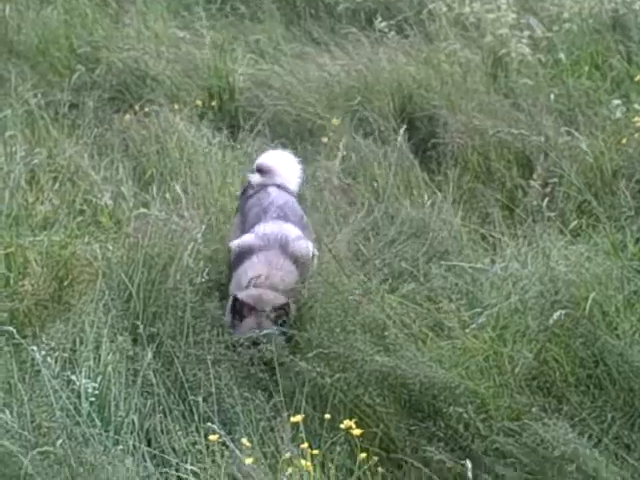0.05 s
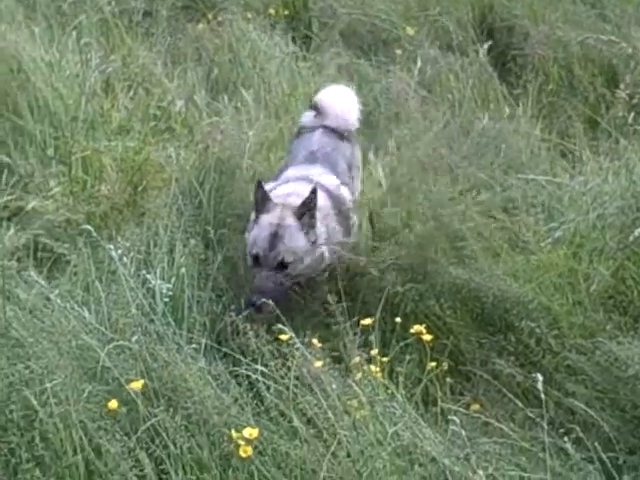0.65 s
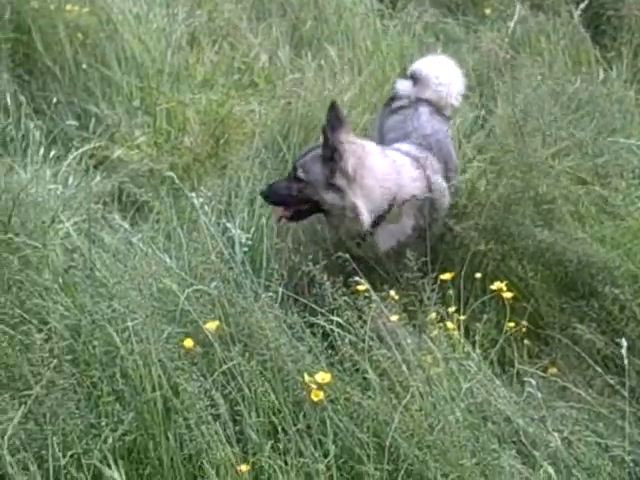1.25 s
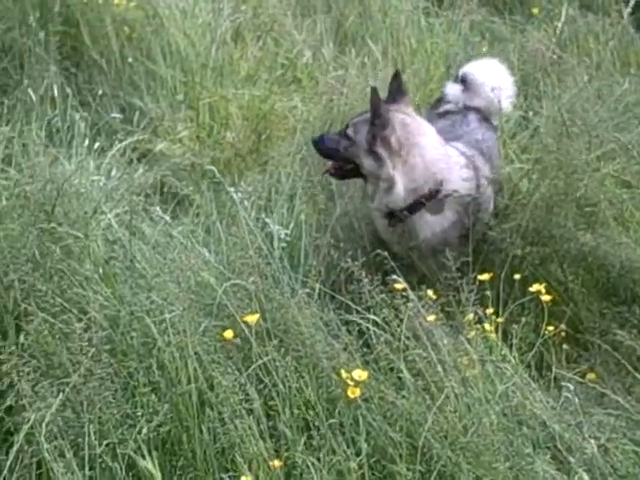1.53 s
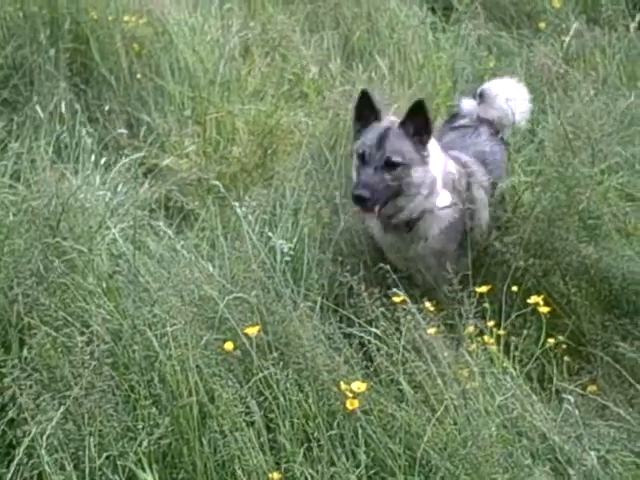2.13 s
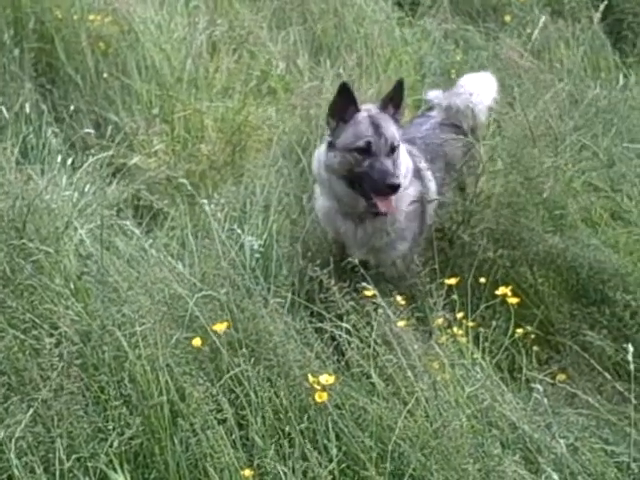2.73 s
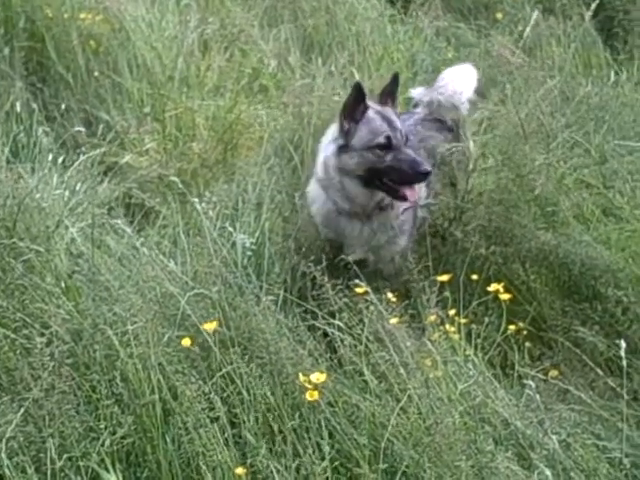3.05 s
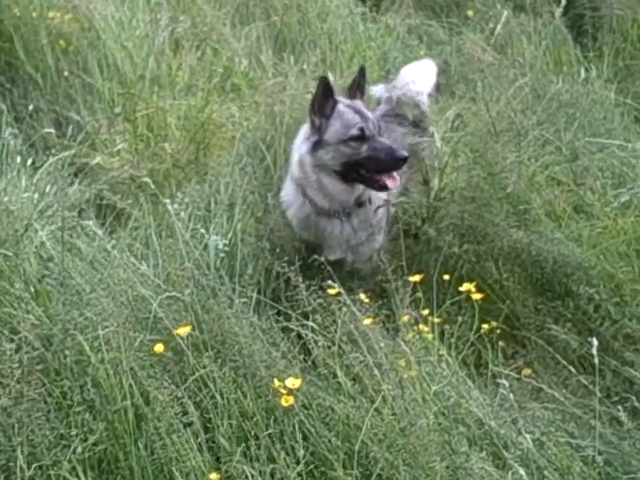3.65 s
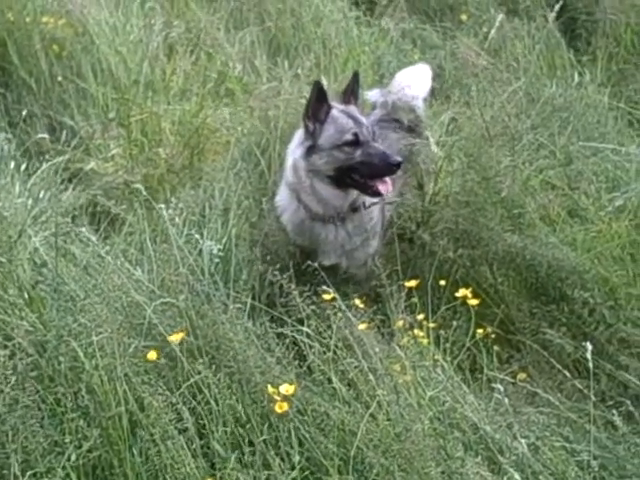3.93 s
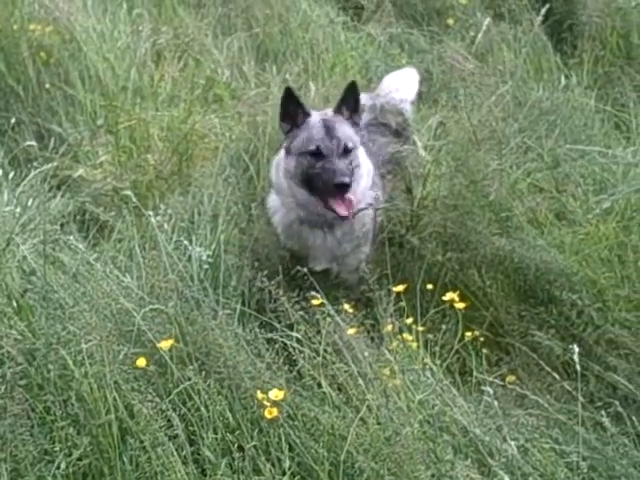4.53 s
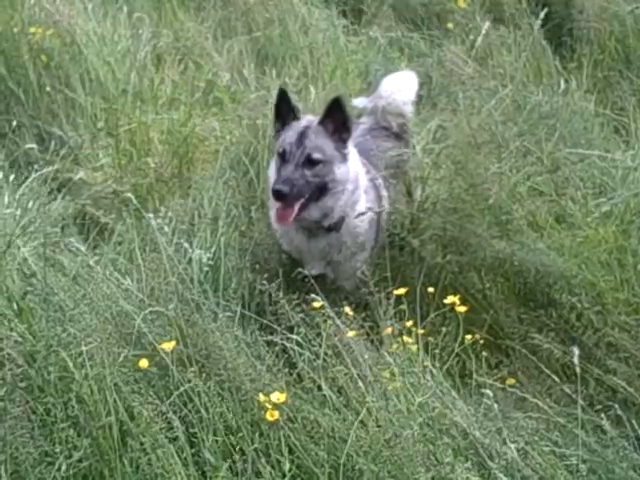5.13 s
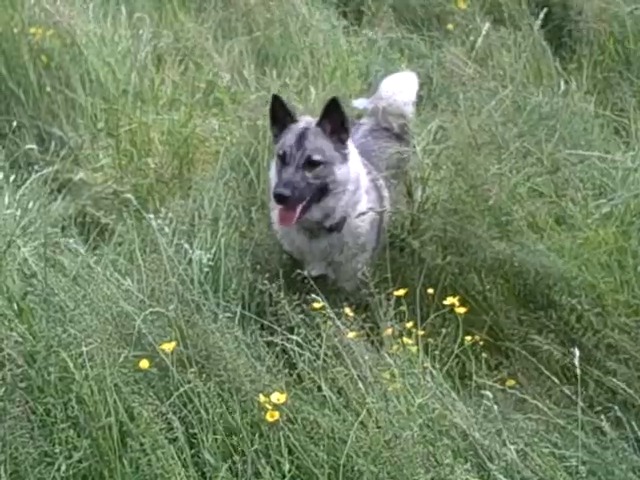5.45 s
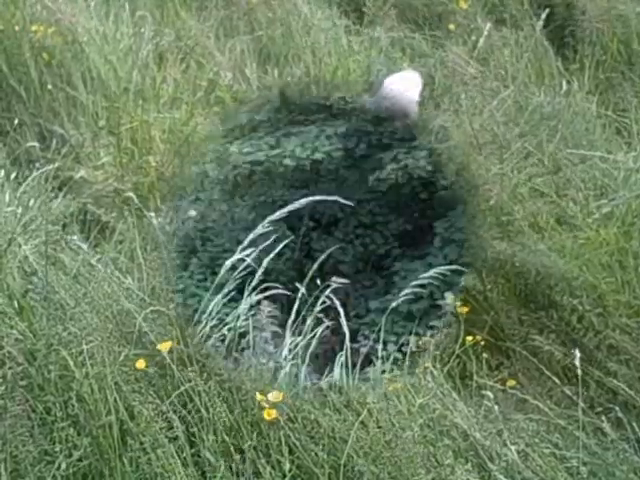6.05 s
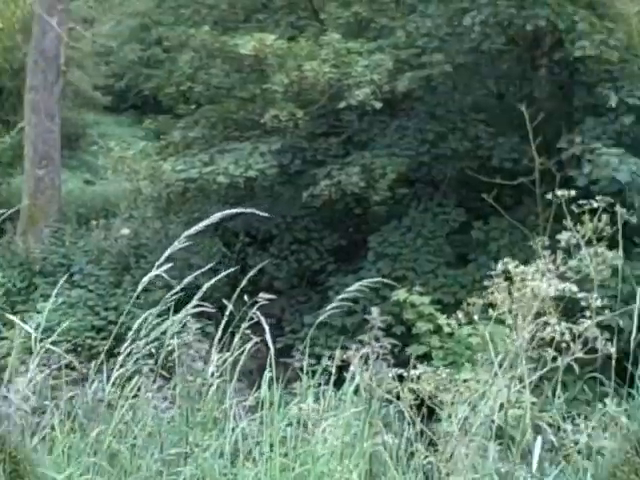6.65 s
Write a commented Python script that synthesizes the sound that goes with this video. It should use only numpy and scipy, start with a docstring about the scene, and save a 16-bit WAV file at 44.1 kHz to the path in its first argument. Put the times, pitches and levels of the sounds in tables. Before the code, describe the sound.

In an open meadow, grass swishes and stems crunch softly as a dog noses through. A distant bird starts repeating arched notes, then a nearer one sings a long run of quick, slurred chirps, lightly echoed by trees. Midway, a hand shifts on the microphone with low rumbles, bumps and small ticks. Leaves stir near the end, all over a steady soft hiss.

```python
"""Songbirds over a meadow

A near bird sings a long run of quick slurred chirps, a farther one repeats arched notes, and others
whistle in the distance: gliding, almost pure tones that the trees throw back. Grass swishes and
stems crunch as a dog noses through, and leaves stir towards the end over a bed of soft hiss.
A hand shifts on the camera with rumble, low bumps and small ticks."""
import sys
import numpy as np
from scipy import signal
from scipy.fft import rfft, irfft
from scipy.io import wavfile

SR = 44100
rng = np.random.default_rng(int(sys.argv[2]) if len(sys.argv) > 2 else 0)


def wav_out(sig):
    """Save sig, one row per channel (or a flat mono array), as 16-bit PCM at SR to the path in sys.argv[1]."""
    wavfile.write(sys.argv[1], SR, np.round(np.clip(np.atleast_2d(sig).T, -1, 1) * 32767).astype(np.int16))


N = 304290
TIME = np.arange(N) / SR

# Tone curves (frequency [Hz], relative level [dB])
AIR_SPECTRUM = [(24, -16), (40, 2.5), (75, -6), (112, -10), (219, -15), (912, -16), (1230, -20.5),
                (2030, -27.5), (3350, -29), (5130, -30.5), (8040, -37), (15800, -39.5)]  # still air and microphone hiss
LEAF_SPECTRUM = [(200, -42), (600, -0.5), (1200, 3), (1900, 2), (3000, -4.5), (5000, -8), (8000, -17.5),
                 (15000, -24)]  # stirring leaves
RESTING_GRIP_SPECTRUM = [(18, 2), (30, 2), (45, -16), (62, 2.5), (85, -18), (125, -23.5), (200, -22),
                         (300, -39), (500, -91)]  # a hand at rest
MOVING_GRIP_SPECTRUM = [(18, 1.5), (40, 2.5), (70, -1), (120, -9.5), (200, -30), (300, -30), (500, -45.5),
                        (900, -103)]  # a hand shifting
SKIN_SPECTRUM = [(60, -31), (120, 3.5), (150, -2), (200, -6), (260, -16), (400, -27), (700, -59)]  # skin on the casing
BLADE_SPECTRUM = [(500, -13), (1200, -5.5), (2000, 0.5), (3500, 0.5), (6000, 1), (9000, 2.5), (12000, -0.5),
                  (15500, 3.5)]  # grass blades brushing

# Fader rides (time [s], relative level [dB])
MURMUR_RIDE = [(0, -63.5), (1.25, -59), (2.5, -63), (3.1, -58), (4.3, -59.5), (6.9, -56)]  # far-off countryside
LEAF_RIDE = [(0, -72), (4.4, -73.5), (4.7, -66), (5.2, -75), (5.8, -83), (6.1, -64), (6.4, -61), (6.6, -58),
             (6.9, -57)]  # stirring leaves
GRIP_RIDE = [(0, -58), (1.15, -54.5), (1.85, -59.5), (3.1, -54), (3.95, -44), (4.5, -43), (4.85, -46.5),
             (5.85, -48), (6.25, -59), (6.9, -53.5)]  # steady rumble of the hand

# Swells (peak time [s], swell time [s], relative level [dB])
GRIP_SHIFTS = [(.27, .05, -50), (.64, .045, -51), (2.16, .06, -47.5), (2.64, .11, -46.5), (3.42, .09, -49),
               (3.815, .07, -32), (4.01, .05, -39.5), (4.3, .14, -34), (4.7, .045, -40.5), (5.13, .13, -37),
               (5.47, .08, -42), (5.64, .07, -43)]  # the hand changes its hold
SKIN_RUBS = [(3.62, 0.0094, -45), (3.82, .03, -40.5), (3.995, 0.034, -42.5), (4.23, 0.095, -51),
             (4.39, 0.011, -36.5), (5.11, 0.061, -60), (5.59, 0.027, -58)]  # skin strokes the casing
GRASS_SWISHES = [(.03, 0.31, -58.5), (.335, .06, -52), (.6, 0.041, -57), (.81, 0.29, -53.5),
                 (1.13, 0.045, -64), (1.36, 0.2, -63), (2.17, 0.06, -69), (2.5, 0.13, -56.5)]  # the dog pushes through

# Bumps of the hand on the camera body (time [s], relative level [dB], pitch [Hz])
HAND_BUMPS = [(0.291, -39, 24.3), (0.64, -39.5, 27.4), (3.623, -26.5, 84.6), (3.647, -33, 43.7),
              (3.776, -28, 74.4), (3.795, -30.5, 49.7), (3.819, -30, 80), (3.831, -28.5, 131),
              (4.098, -35.5, 68), (4.183, -26, 50.4), (4.335, -26, 46.3), (4.393, -25.5, 43.2),
              (4.685, -30.5, 45.3), (4.845, -30, 31), (5.09, -31.5, 55.3)]
# Ticks of the casing and of snapping stalks (time [s], peak [dB], centre [Hz], ring time [s])
SMALL_TICKS = [(0.205, -43, 1800, 0.0029), (1.038, -36, 7360, .002), (1.037, -47, 4700, 0.0022),
               (2.168, -47.5, 7060, .002), (3.6153, -35, 7300, 0.00053), (3.6163, -39, 4900, 0.0021),
               (3.972, -41, 5400, 0.00088), (4.28, -40, 5130, 0.00075), (4.541, -40, 5600, 0.0005),
               (4.78, -44.5, 1740, 0.0028), (4.778, -47, 3220, .001), (5.111, -47, 1820, 0.0019)]
# Crunches of bending stems (time [s], length [s], level [dB], centre [Hz])
STEM_CRUNCHES = [(0.074, 0.022, -59.5, 1750), (0.096, .03, -64, 1790), (0.584, 0.065, -67, 1750),
                 (0.754, 0.063, -63, 1780), (0.761, 0.057, -70, 2600), (0.892, 0.053, -63, 1950),
                 (1.118, 0.068, -66, 2770), (6.324, 0.015, -57.5, 1740), (6.582, 0.022, -57, 1770),
                 (6.613, 0.013, -55.5, 1120), (6.8, 0.015, -53, 1640)]

# Thin whistles, mostly of distant birds; the short slide at 3.951 s is a brief chirp of the near bird (time
# [s], length [s], start [Hz], end [Hz], level [dB], buzz depth [Hz])
THIN_WHISTLES = [(0.08, .14, 2380, 2410, -66, 31), (0.867, .064, 2940, 2980, -61, 53),
                 (1.435, 0.19, 7520, 7480, -67.5, 47), (1.953, 0.057, 2400, 2056, -57.5, 190),
                 (2.031, 0.06, 1950, 2160, -57.5, 170), (2.2, .11, 1230, 1145, -62.5, 35),
                 (2.34, .08, 8500, 7860, -65, 64), (3.01, 0.18, 7360, 7390, -66.5, 52),
                 (3.951, .028, 5700, 4800, -56.5, 60), (4.43, 0.11, 8420, 7750, -64, 140),
                 (4.517, 0.082, 8100, 7950, -66, 150), (4.583, .075, 7460, 6320, -62.5, 110),
                 (4.862, 0.074, 7650, 6350, -61.5, 130), (5.48, 0.22, 7520, 7480, -74, 45)]
# Far bird's note shapes by kind
# (rise [s], hold [s], fall [s], rise level over the fall [dB], crest level over the fall [dB])
ARCH_SHAPES = {"low": (.031, .013, .026, -9.5, -16), "high": (.053, .011, .028, -1.5, -16),
               "drawn": (.034, .028, .042, -.5, -1.5)}
# Far bird's phrases: one low arch and two high ones, with two drawn-out notes to close
# (crest time [s], kind, crest pitch [Hz], foot pitch [Hz], relative fall level [dB])
FAR_ARCHES = [(1.915, "low", 2950, 2430, -48.5), (2.109, "high", 3520, 2560, -54),
              (2.294, "high", 4050, 2930, -54), (2.697, "low", 3320, 2480, -48),
              (2.917, "high", 3900, 2740, -54.5), (3.091, "high", 4000, 2950, -53.5),
              (3.466, "low", 3160, 2400, -46.5), (3.692, "high", 3820, 2500, -49.5),
              (3.862, "high", 3980, 2730, -52), (4.454, "low", 3180, 2540, -51),
              (4.656, "high", 3920, 2800, -52), (4.856, "high", 4120, 2880, -54.5),
              (5.364, "low", 3230, 2450, -51), (5.586, "high", 3920, 2830, -54.5),
              (5.739, "high", 4200, 2850, -56.5), (6.168, "drawn", 2850, 2400, -56),
              (6.78, "drawn", 2850, 2380, -51)]
# Near bird's chirp shapes by kind
# (glide along the ledge [Hz], fall [s], end pitch [Hz], fall level over the ledge [dB], plunge)
CHIRP_SHAPES = {"flat": (71, .018, 4298, -6, 2), "low": (108, 0.09, 3220, -9, 2),
                "slur": (-110, .042, 3780, -7, 1.0), "step": (-70, .056, 3400, -5.5, 2.2)}
# Near bird's chirps
# (time [s], kind, ledge pitch [Hz], hold [s], relative dive level [dB], relative ledge level [dB])
NEAR_CHIRPS = [(2.691, "flat", 4790, .035, -74.5, -64), (2.957, "flat", 4280, 0.035, -65, -58),
               (3.245, "slur", 4950, .026, -61, -54), (3.53, "flat", 4120, 0.056, -52, -55.5),
               (3.827, "flat", 4650, 0.051, -56, -54.5), (4.141, "step", 5500, 0.016, -55, -51.5),
               (4.452, "low", 4100, 0.043, -48, -51.5), (4.786, "slur", 5000, 0.019, -51, -48.5),
               (5.048, "slur", 4720, 0.033, -52, -49), (5.345, "low", 3730, .05, -52, -58),
               (5.661, "slur", 4700, 0.026, -52, -49), (5.816, "slur", 5200, 0.029, -66, -66.5),
               (5.974, "step", 5620, 0.0068, -58.5, -54), (6.162, "low", 3720, 0.044, -51.5, -56),
               (6.317, "low", 3770, 0.055, -55, -67), (6.47, "slur", 4770, 0.039, -45, -47.5),
               (6.53, "low", 4200, .04, -71, -55.5), (6.636, "flat", 4620, 0.045, -56.5, -64),
               (6.764, "step", 5690, 0.008, -52.5, -46)]
# Its upward hooks between chirps (time [s], top pitch [Hz], relative level [dB])
NEAR_HOOKS = [(4.574, 4600, -57), (5.467, 4350, -61), (5.928, 4130, -64.5), (6.086, 3970, -62.5),
              (6.28, 4450, -57), (6.435, 4540, -66), (6.879, 4030, -51.5)]


def gain_of(db):
    return 10 ** (np.asarray(db) / 20)


def unit_rms(x):
    return x / np.sqrt(np.mean(x ** 2) + 1e-20)


def ride_db(rows):
    """A fader move: straight lines between (time, level) points."""
    return np.interp(TIME, *np.transpose(rows))


def add(mix, start_s, sound):
    part = mix[max(round(start_s * SR), 0):][:len(sound)]
    part += sound[:len(part)]


def colour(x, spectrum):
    """EQ by a tone curve; rms 1."""
    points_hz, points_db = np.transpose(spectrum)
    hz = np.fft.rfftfreq(len(x), 1 / SR)
    eq_db = np.interp(np.log(hz + 1), np.log(points_hz + 1), points_db)
    return unit_rms(irfft(rfft(x) * gain_of(eq_db), len(x)))


def noise(spectrum):
    return colour(rng.standard_normal(N), spectrum)


def drift(rate_hz):
    """Random modulation, rolled off above rate_hz; rms 1."""
    hz = np.fft.rfftfreq(N, 1 / SR)
    return unit_rms(irfft(rfft(rng.standard_normal(N)) / (1 + (hz / rate_hz) ** 4), N))


def swells(rows, release, roundness):
    """Envelope of strokes that build and die away; release is a share of the swell time."""
    power = np.zeros(N)
    for peak_s, swell_s, db in rows:
        away = np.maximum(peak_s - TIME, (TIME - peak_s) / release) / swell_s
        power += gain_of(db) ** 2 * np.exp(-2 * np.minimum(away, 10) ** roundness)
    return np.sqrt(power)


def meadow(air_db=-56.5):
    """The bed: steady hiss, a soft far-off murmur, and leaves that begin to stir."""
    murmur = noise([(100, -24), (300, -4.5), (550, 2.5), (900, 3.5),
                    (1300, -12.5), (2500, -30), (6000, -63)])
    leaves = gain_of(ride_db(LEAF_RIDE) + 2.7 * drift(30)) * noise(LEAF_SPECTRUM)
    air = gain_of(air_db) * noise(AIR_SPECTRUM)
    return air + gain_of(ride_db(MURMUR_RIDE) - 5.5) * murmur + leaves


def handling(bump_width_cycles=.35, lumpy_db=.8):
    """The grip rumbles and rubs, brighter as it shifts; a bump rocks the camera for about one cycle."""
    shake = np.hypot(gain_of(ride_db(GRIP_RIDE)), swells(GRIP_SHIFTS, release=.8, roundness=1.8))
    level_db = 20 * np.log10(shake) + lumpy_db * drift(7)
    crossfade = np.clip((level_db + 48) / 9, 0, 1)
    resting = gain_of(-2) * np.sqrt(1 - crossfade) * noise(RESTING_GRIP_SPECTRUM)
    moving = gain_of(.5) * np.sqrt(crossfade) * noise(MOVING_GRIP_SPECTRUM)
    rubs = swells(SKIN_RUBS, release=.9, roundness=3) * noise(SKIN_SPECTRUM)
    out = gain_of(level_db) * (resting + moving) + rubs
    for centre_s, db, hz in HAND_BUMPS:
        cycles = np.arange(-2, 2, hz / SR)
        bump = -np.sin(2 * np.pi * cycles) * np.exp(-(cycles / bump_width_cycles) ** 2 / 2)
        add(out, centre_s - 2 / hz, gain_of(db + .5) * bump)
    return out


def resonate(x, hz, q):
    """One resonance applied twice, for steep skirts."""
    b, a = signal.iirpeak(hz, q, SR)
    return signal.lfilter(b, a, signal.lfilter(b, a, x))


def ticks():
    """Casing and stalks tick: a sharp snap and a short rattle in one broad resonance."""
    out, t = np.zeros(N), np.arange(2048) / SR
    for start_s, peak_db, hz, ring_s in SMALL_TICKS:
        burst = rng.standard_normal(len(t)) * np.exp(-t / ring_s)
        snap = gain_of(-11) * burst * hz / 5000  # higher ticks get more raw edge
        tick = resonate(burst, hz, q=1.5) + snap
        add(out, start_s, gain_of(peak_db) * tick / abs(tick).max())
    return out


def stems(clicks_per_s=1500):
    """A bending stem cracks in a quick cluster of tiny clicks."""
    out = np.zeros(N)
    for start_s, length_s, db, hz in STEM_CRUNCHES:
        count = int(length_s * SR)
        clicks = rng.standard_normal(count) * (rng.random(count) < clicks_per_s / SR)
        crunch = resonate(clicks, hz, q=2.9) * signal.windows.tukey(count, .5)
        add(out, start_s, gain_of(db) * unit_rms(crunch))
    return out


def grass(grain_db=3, patchy_db=1):
    """Blades brush one another as the dog pushes through: a dense spray of tiny scrapes."""
    scrapes = rng.standard_normal(N) * gain_of(grain_db * np.minimum(rng.exponential(1, N), 4))
    at_rest = gain_of(-75.5)
    push = np.hypot(swells(GRASS_SWISHES, release=.87, roundness=1.27), at_rest)
    return push * gain_of(4 + patchy_db * drift(44)) * colour(scrapes, BLADE_SPECTRUM)


def tree_echo(x, t60_s, build_s, sway_hz=7):
    """Echoes off trunks and swaying foliage: three sets of sparse, dying taps take turns."""
    t, out = np.arange(SR) / SR, np.zeros(N)
    envelope = gain_of(-60 * t / t60_s) * (1 - np.exp(-t / build_s))
    for k in range(3):
        taps = rng.standard_normal(SR) * (rng.random(SR) < .1) * envelope
        send = np.sqrt(2 / 3) * np.cos(2 * np.pi * (sway_hz * TIME + k / 3))
        out += signal.fftconvolve(x * send, taps / np.linalg.norm(taps))[:N]
    return out


def twitter(count=7, span_s=(1.25, 3.75), length_s=.07, hz=5300, db=-72.5, slide=.02, buzz_hz=70):
    """Whistle rows for a faint twitter: loosely spaced short slides onto one pitch."""
    jitters, bends = rng.standard_normal((count, 2)).T
    times = np.linspace(*span_s, count) + length_s * jitters
    return [(s, length_s, hz * (1 + slide * bend), hz, db, buzz_hz) for s, bend in zip(times, bends)]


def distant_birds():
    """Faint whistles, some of them buzzy, that slide and settle, smeared by the trees."""
    dry, buzz = np.zeros(N), drift(163)
    for start_s, length_s, start_hz, end_hz, db, buzz_hz in THIN_WHISTLES + twitter():
        progress = np.linspace(0, 1, int(length_s * SR))
        slide_hz = end_hz + (start_hz - end_hz) * np.exp(-(progress / .37) ** 2)
        hz = slide_hz + buzz_hz * np.interp(start_s + progress * length_s, TIME, buzz)
        envelope = gain_of(db) * np.sqrt(np.hanning(len(progress)))
        add(dry, start_s, envelope * np.sin(2 * np.pi * np.cumsum(hz) / SR))
    return dry + gain_of(-.5) * tree_echo(dry, t60_s=.32, build_s=.003)


def song(notes, waver, flutter_db):
    """Each note is a near-pure tone easing through four pitches; the air makes it flutter."""
    out, flutter = np.zeros(N), gain_of(flutter_db * drift(54))
    wobble = 1 + waver * drift(150)
    for start_s, stages_s, pitches_hz, levels_db, plunge in notes:
        knots = start_s + np.cumsum(np.r_[0, stages_s])
        t = np.arange(knots[0], knots[-1], 1 / SR)
        stage = np.interp(t, knots, np.arange(4))
        # a plunge above 1 makes the last fall start fast and linger at its end
        stage = np.where(stage > 2, 3 - (3 - stage) ** plunge, stage)
        eased = stage - np.sin(2 * np.pi * stage) / (2 * np.pi)
        hz = np.interp(eased, np.arange(4), pitches_hz) * np.interp(t, TIME, wobble)
        level = gain_of(np.interp(t, (knots[1:] + knots[:-1]) / 2, levels_db))
        attack = (t - t[0]) / (.64 * stages_s[0])
        release = (t[-1] - t) / (.47 * stages_s[2])
        fade = np.clip(np.minimum(attack, release), 0, 1)
        add(out, start_s, np.sqrt(2) * level * fade * np.sin(2 * np.pi * np.cumsum(hz) / SR))
    return out * flutter


def arch(crest_s, kind, crest_hz, foot_hz, fall_db, plunge=1.25):
    """A note that climbs from its foot, sags along a short crest and falls back a little flat."""
    rise_s, hold_s, fall_s, rise_db, crest_db = ARCH_SHAPES[kind]
    pitches_hz = foot_hz, crest_hz, crest_hz * .985, foot_hz * .97
    levels_db = fall_db + rise_db, fall_db + crest_db, fall_db
    return crest_s - rise_s, (rise_s, hold_s, fall_s), pitches_hz, levels_db, plunge


def far_bird():
    """Arched notes that linger on their low ending, half drowned in their echo."""
    dry = song([arch(*row) for row in FAR_ARCHES], waver=.013, flutter_db=2.4)
    early = gain_of(-2.3) * tree_echo(dry, t60_s=.23, build_s=.012)
    tail = gain_of(-12) * tree_echo(dry, t60_s=1, build_s=.09)
    return gain_of(-2.6) * dry + early + tail


def hook(start_s, top_hz, db, stages_s=(.019, .0067, .0154), plunge=1):
    """A note that flicks up, holds and droops, at an even level."""
    return start_s, stages_s, top_hz * np.array([.75, 1, 1, .81]), (db, db, db), plunge


def chirp(start_s, kind, ledge_hz, hold_s, dive_db, ledge_db, top_hz=6630, dive_s=.026):
    """A note that dives from the top onto a ledge, holds it, then falls away."""
    glide_hz, fall_s, end_hz, fall_db, plunge = CHIRP_SHAPES[kind]
    pitches_hz = top_hz, ledge_hz, ledge_hz + glide_hz, end_hz
    levels_db = dive_db, ledge_db, ledge_db + fall_db
    return start_s, (dive_s, hold_s, fall_s), pitches_hz, levels_db, plunge


def near_bird():
    """The lead voice: clear slurs and hooks with a light echo from the trees."""
    notes = [chirp(*row) for row in NEAR_CHIRPS] + [hook(*row) for row in NEAR_HOOKS]
    dry = song(notes, waver=.007, flutter_db=2)
    early = gain_of(-8.5) * tree_echo(dry, t60_s=.2, build_s=.025)
    tail = gain_of(-15) * tree_echo(dry, t60_s=.84, build_s=.036)
    return gain_of(-1.17) * dry + early + tail


def scene():
    """The mono mix."""
    birds = near_bird() + far_bird() + distant_birds()
    return (birds + grass() + stems() + meadow() + handling() + ticks())[None]


def record(dry):
    """The camera's band limit: a steep high cut."""
    high_cut = signal.firwin(511, cutoff=15850, window=("kaiser", 9), fs=SR)
    return signal.oaconvolve(dry, high_cut[None], "same")


dry = scene()
out = record(dry)
wav_out(out)
```